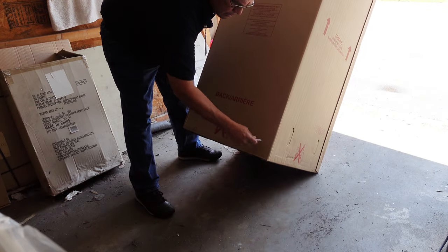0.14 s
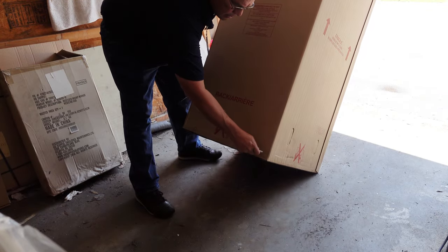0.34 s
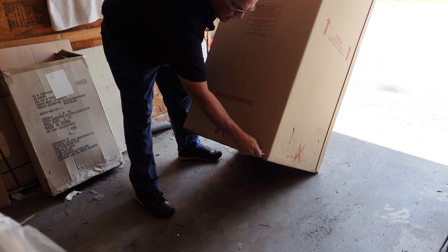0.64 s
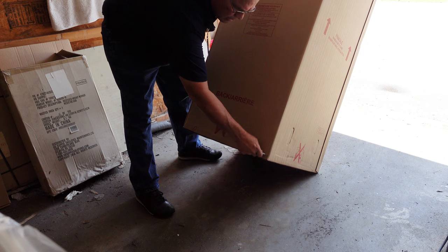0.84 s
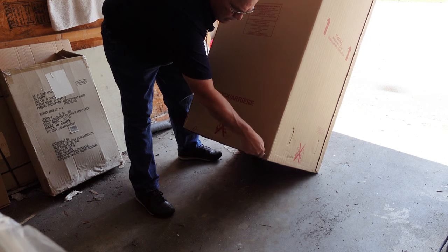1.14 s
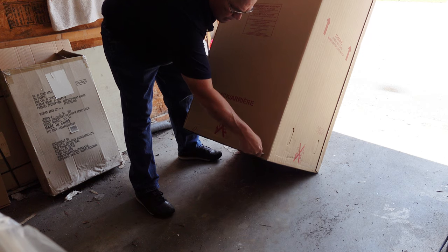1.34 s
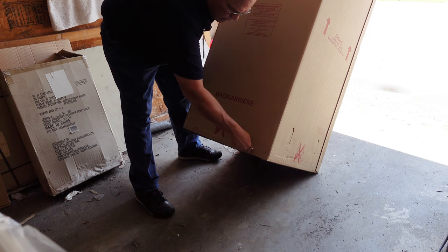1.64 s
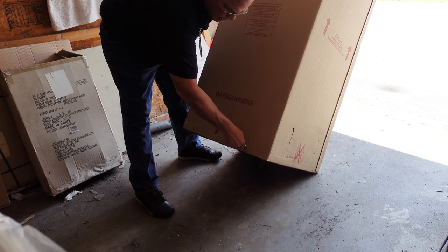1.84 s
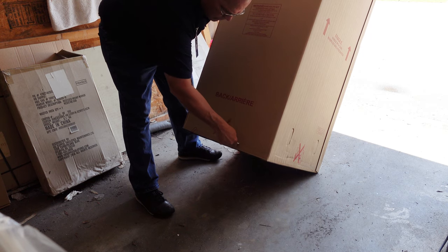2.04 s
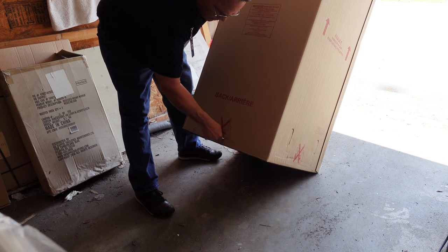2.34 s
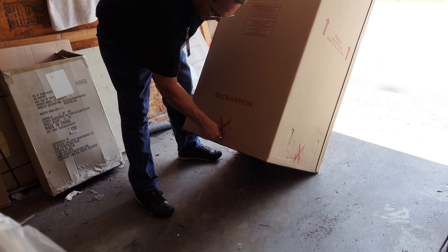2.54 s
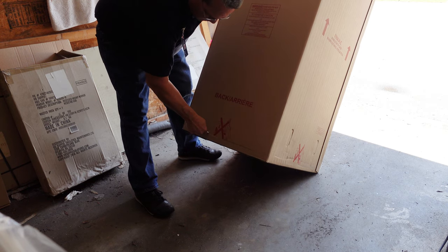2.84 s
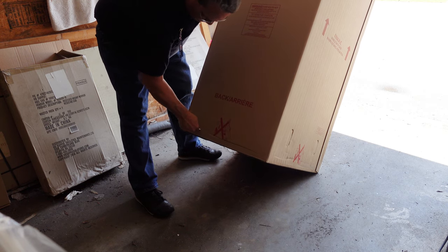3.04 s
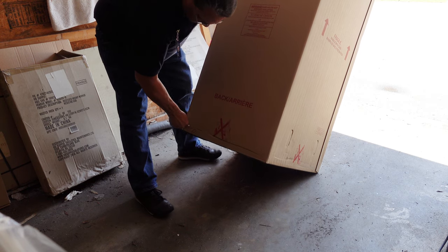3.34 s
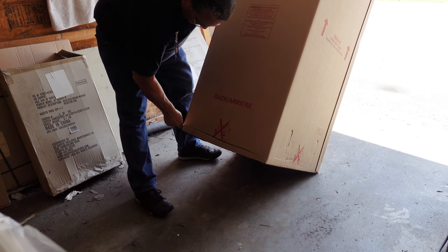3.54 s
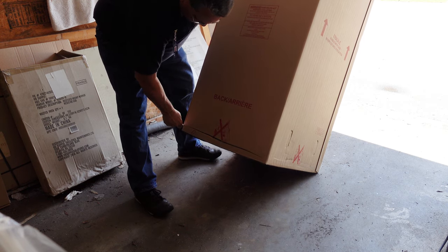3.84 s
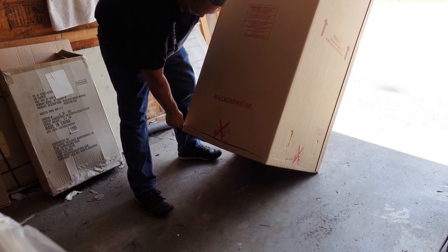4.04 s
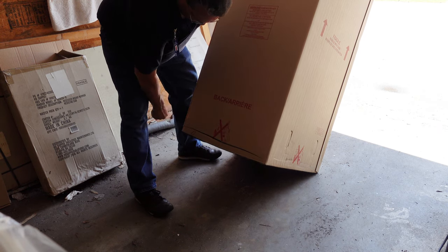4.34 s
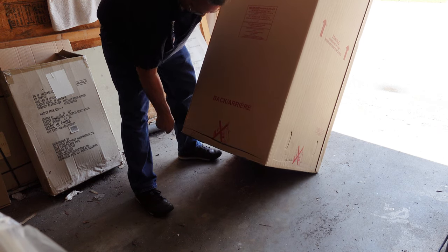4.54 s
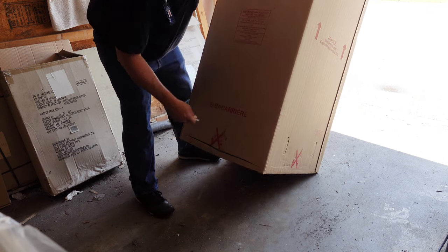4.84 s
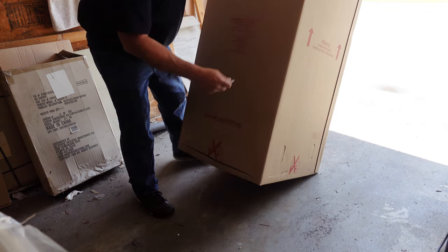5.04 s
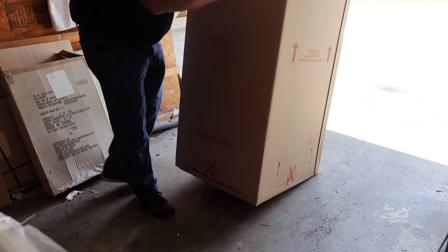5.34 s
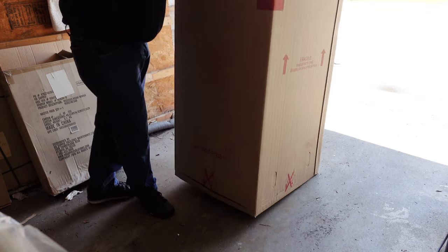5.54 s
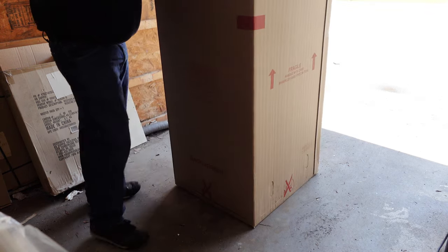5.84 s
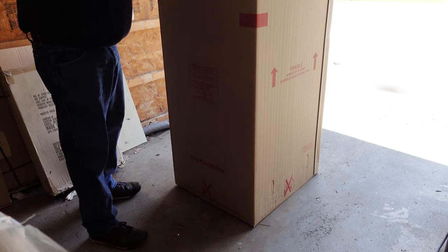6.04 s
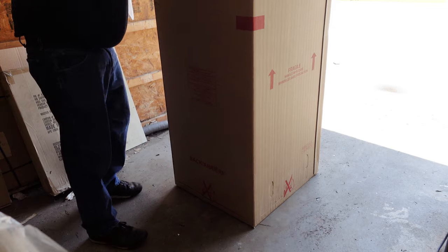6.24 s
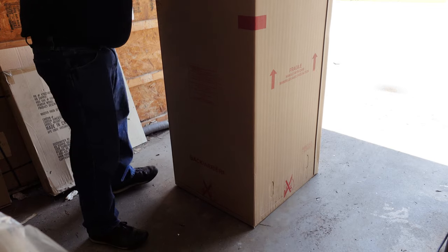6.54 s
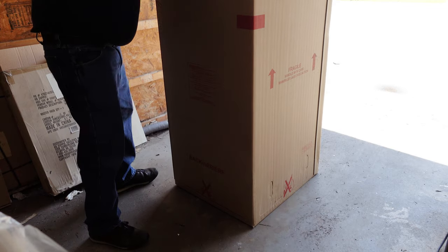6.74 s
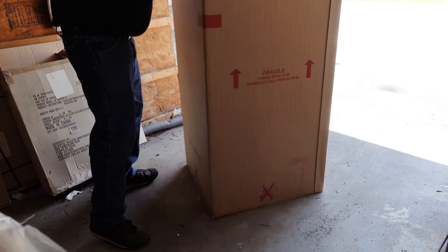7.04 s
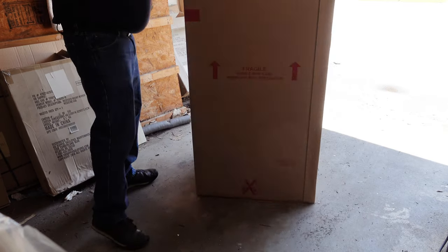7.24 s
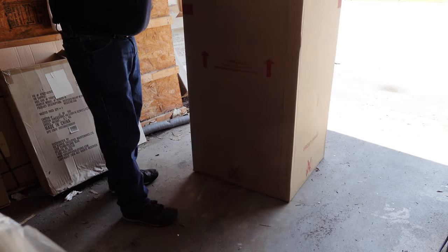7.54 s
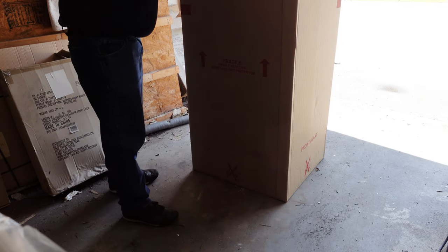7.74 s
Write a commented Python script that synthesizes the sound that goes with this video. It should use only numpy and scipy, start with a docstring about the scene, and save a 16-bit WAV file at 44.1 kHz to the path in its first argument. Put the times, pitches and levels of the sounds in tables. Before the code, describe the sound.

A blade stabs and rips along a big cardboard box in a garage, then gritty scuffs and hollow bumps before the box drags over concrete.

```python
"""A knife slits a tall cardboard box in a garage: two stabs, two long cuts, a few short rips, clicks and knocks.
Cuts are random friction grains, ridged by the corrugations, that excite box boom, wall rasp and edge hiss.
A short squeak and low falling blips, scuffs, grit and bumps follow; then the box is dragged over concrete.
A far electric motor, sines on multiples of its shaft rate over a rush of air, whines through the open door.
Steady filtered noise is the outdoor hush; random echoes place the near sounds in the garage."""
import sys
import numpy as np
from scipy import signal
from scipy.fft import rfft, irfft, next_fast_len
from scipy.io import wavfile

SR = 44100
rng = np.random.default_rng(int(sys.argv[2]) if len(sys.argv) > 2 else 0)


def dump_mix(stems):
    """Bounce the given channels to the path in sys.argv[1] as a 16-bit WAV at rate SR."""
    frames = np.atleast_2d(stems).T  # one column per channel
    limited = np.clip(frames, -1, 1)  # hard clip at full scale
    pcm = np.round(limited * 32767).astype(np.int16)
    wavfile.write(sys.argv[1], SR, pcm)


N = 348283
TIME = np.arange(N) / SR
TAPS = 4096  # filter length, samples
HZ = np.fft.rfftfreq(TAPS, 1 / SR)

# spectrum of torn board: f/Hz, density/dB per Hz
TEAR_SPECTRUM = [(40, -57), (400, -16.5), (750, -7), (1000, -7), (1400, 1), (2000, -2), (3300, 1.5),
                 (5000, 1), (7000, -1.5), (9000, -10.5), (12000, -18), (16000, -28)]
# spectrum of rubbing on the gritty floor: f/Hz, density/dB per Hz
FLOOR_SPECTRUM = [(35, -64), (60, -43), (256, -23.5), (380, -14.5), (540, -10), (822, -10.5), (1250, -2),
                  (2190, 1), (5000, 0), (7750, -4), (12400, -18.5), (16000, -27)]


def gain_of(db):
    """Decibels to amplitude."""
    return 10 ** (np.asarray(db) / 20)


def evened(x):
    """Scales to rms 1."""
    return x / np.sqrt(np.mean(x ** 2) + 1e-20)


def read(points, hz=HZ):
    """Interpolates a spectrum table on a log-frequency axis."""
    f, value = np.transpose(points)
    return np.interp(np.log(hz + 1), np.log(f + 1), value)


def tilt(db_per_octave):
    """A straight spectral slope in dB, pivoting at 3500 Hz."""
    return db_per_octave * np.log2((HZ + 1) / 3500)


def follow(rows, t):
    """The columns of a curve table at the times t."""
    s, *columns = np.transpose(rows)
    return [np.interp(t, s, c) for c in columns]


def add(mix, s, sound):
    """Mixes a sound in at time s."""
    part = mix[max(round(s * SR), 0):][:len(sound)]
    part += sound[:len(part)]


def impulse(db):
    """The minimum-phase impulse response of a dB spectrum, floored 100 dB below its peak."""
    log_gain = np.maximum(db - db.max(), -100) * np.log(10) / 20
    circle = np.concatenate([log_gain, log_gain[-2:0:-1]])
    return np.fft.ifft(np.exp(np.conj(signal.hilbert(circle)))).real


def colour(x, db):
    """Filters by a dB spectrum, keeping the power of white input."""
    h = impulse(db)
    return signal.fftconvolve(x, h / np.linalg.norm(h))[:len(x)]


def wander(size, hz):
    """Low-passed noise, rms 1 over the scene's length, cut to size."""
    f = np.fft.rfftfreq(N, 1 / SR)
    slow = irfft(rfft(rng.standard_normal(N)) / (1 + (f / hz) ** 4), N)
    return evened(slow)[:size]


def grains(size, per_s, spread_db):
    """A random train of tiny ruptures, a few much larger than the rest, rms 1."""
    height = gain_of(spread_db * np.minimum(rng.exponential(1, size), 4))
    height = height * rng.choice([-1, 1], size)
    return evened(height * (rng.random(size) < per_s / SR))


def gate(t, attack, stop, release):
    """Linear rise over the attack, hold until the stop, exponential decay; all in seconds."""
    return np.minimum(t / max(attack, 1e-4), 1) * np.exp(-np.maximum(t - stop, 0) / max(release, 1e-3))


def ports(a, b):
    """Two unrelated sounds become a diffuse field at a close pair of microphones."""
    # f/Hz, left-right likeness/0-1
    likeness = [(100, 1), (500, 0.9), (1000, 0.63), (2000, 0.54), (4000, 0.62), (8000, 0.38), (14000, 0.24)]
    same = np.clip(read(likeness, np.fft.rfftfreq(len(a), 1 / SR)), -1, 1)
    return np.array([a, irfft(same * rfft(a) + np.sqrt(1 - same ** 2) * rfft(b), len(a))])


def hush(spectrum):
    """Steady diffuse noise, each source noise coloured by the spectrum."""
    return ports(*(colour(rng.standard_normal(N), read(spectrum)) for _ in range(2)))


def motor(whine_db, rush_db, waver, fading_db):
    """A far motor: multiples of the shaft rate waver together and fade separately over its rush of air."""
    # how the motor carries: t/s, level/dB, share of the second whine colour/0-1
    carry = [(0, -24.5, 0.2), (1.2, -13, 0.1), (2.5, -4, 0.1), (3.7, -6, 0.56), (5.4, -2.5, 0.46),
             (6.2, 0.5, 0.9), (6.7, 1.5, 0.7), (7.4, 6, 1), (7.9, -17, 1)]
    # the motor's air: f/Hz, density/dB per Hz
    air_rush = [(180, -68.5), (300, -14.5), (486, -11.5), (1230, -11), (3130, -7.5), (3460, -7), (5800, -3),
                (6520, -31), (7820, -1.5), (9390, -15), (16000, -43)]
    # shaft rate before the waver: t/s, f/Hz
    shaft = [(4.0, 283.5), (5.2, 283.45), (6.3, 283.15)]
    # two whine colours, one row each; columns are successive multiples: relative level/dB
    whine_colours_db = [
        [-71.5, -91, -69.5, -82, -73, -85, -75, -88, -67.5, -88, -72, -88, -72.5, -66.5, -70, -69, -71],
        [-93, -88, -82, -86, -69, -71, -84, -82, -70, -86, -85, -74, -65, -92, -73, -74, -76],
    ]
    lowest_multiple = 12
    partner_hz, partner_db = 107, 2.5  # even multiples have a partner above, in the first colour only
    fade_step_s = 0.15

    carry_db, second = follow(carry, TIME)
    second = np.clip(second, 0, 1)
    turns = np.cumsum(follow(shaft, TIME)[0] * (1 + waver * wander(N, 8.0))) / SR
    knots = np.arange(0, N / SR + 1, fade_step_s)
    whine = np.zeros((2, N))
    for k, (first_db, second_db) in enumerate(zip(*whine_colours_db), lowest_multiple):
        partials = [(k * turns, gain_of(first_db) * (1 - second) + gain_of(second_db) * second)]
        if k % 2 == 0:
            partials.append((k * turns + partner_hz * TIME, gain_of(first_db + partner_db) * (1 - second)))
        for cycles, gain in partials:
            fading = np.interp(TIME, knots, gain_of(fading_db * rng.standard_normal(len(knots))))
            phase = 2 * np.pi * rng.random() + .5 * rng.standard_normal((2, 1))
            whine += np.sqrt(2) * gain * fading * np.sin(2 * np.pi * cycles + phase)
    return gain_of(carry_db) * (gain_of(whine_db) * whine + gain_of(rush_db) * hush(air_rush))


def snap(s, db, hz, octaves, crumble):
    """A click or knock that crumbles away: decaying noise coloured around a centre frequency."""
    t = np.arange(TAPS) / SR
    peak_db = -20 * np.log10(1 + (np.log2((HZ + 1) / hz) / octaves) ** 2)
    burst = rng.standard_normal(TAPS) * np.exp(-t / max(crumble, 1e-4))
    click = colour(burst, peak_db + read(TEAR_SPECTRUM))
    return s, gain_of(db) * click / abs(click).max()


def panels_db():
    """The spectrum that the box panels ring with: a power sum of modes."""
    # panel modes: f/Hz, half width/Hz (to -6 dB), level/dB
    modes = [(151, 59, -3), (310, 29, -0.5), (422, 23.4, 2.5), (588, 190, -0.5), (890, 190, -2.5),
             (1260, 300, -3)]
    power = sum(gain_of(db) ** 2 / (1 + ((HZ - f) / w) ** 2) ** 2 for f, w, db in modes)
    return 10 * np.log10(power + 1e-12)


def rasp(s, rise, decay, db, tilt_db, boom_db, boom_hz, spectrum=TEAR_SPECTRUM):
    """A short burst of tearing or scuffing; the place of contact picks which box panels ring under it."""
    t = np.arange(SR // 3) / SR
    stroke = gate(t, rise, rise, decay)
    tear = colour(stroke * grains(len(t), per_s=9000, spread_db=3.0), read(spectrum) + tilt(tilt_db))
    place_db = -9.5 * np.log2((HZ + 1) / boom_hz) ** 2
    # the panels take up the blow slowly: its power is smoothed over 6.6 ms
    flex = signal.lfilter([1], [1, -np.exp(-1 / (0.0066 * SR))], stroke ** 2) ** .5
    boom = colour(flex * rng.standard_normal(len(t)), panels_db() + place_db)
    boom *= np.linalg.norm(stroke) / np.linalg.norm(boom)
    return s, gain_of(db) * tear + gain_of(boom_db) * boom


def rub(drive, spectrum, wall, boom_db, hiss_db):
    """Friction grains excite the box (boom), the wall at the contact (rasp) and the sharp edge (hiss)."""
    shape_db = read(spectrum) + sum(db / (1 + (2 * (HZ - f) / w) ** 2) for f, w, db in wall)
    shape_db += 0.37 * np.clip(panels_db() + 8.5, -8, 8) * (HZ < 1000)  # panel modes show in the boom
    below = 1 / (1 + (HZ / 900) ** 8)
    above = 1 - 1 / (1 + (HZ / 5000) ** 12)
    shares = below, np.abs(1 - below - above), above
    size = next_fast_len(len(drive) + TAPS)
    hz = np.fft.rfftfreq(size, 1 / SR)
    sound = rfft(colour(drive, shape_db), size)
    boom, middle, hiss = (evened(irfft(sound * np.interp(hz, HZ, share), size)[:len(drive)])
                          for share in shares)
    return middle + gain_of(boom_db) * boom + gain_of(hiss_db) * hiss


def cut(start, end, db, swell_db, boom_db, hiss_db, flute_hz, spectrum, wall):
    """The blade is drawn along the box ever faster, catching on each corrugation in turn."""
    # the blade sticks for a moment: t/s, half length/s (to 1/e of the dip), dip/dB
    stalls = [(2.855, 0.034, -6.5), (3.136, .01, -9), (3.173, 0.013, -5)]
    attack_s, release_s = 0.015, 0.012
    easiest, bite_db = 0.4, 0.5  # bites in, runs most easily at this share of the cut, then is pulled harder
    ease_from, ease_db = 0.89, -3.5  # the pull slackens just before the corner
    judder_db, judder_hz = 0.65, 25  # the board resists unevenly
    speed_up, flute_depth, flute_jitter, jitter_hz = 2.1, 0.24, 0.249, 9.2
    mid_panel_db, hiss_per_db = 1.5, -0.02  # booms most in mid-panel; hiss share falls slightly with force
    ring_at_start, ring_at_end = 1.88, 0.8  # scale of wall lifts: clear at first, damped as the blade digs in

    t = np.arange(0, end - start + 6 * release_s, 1 / SR)
    along = np.minimum(t / (end - start), 1)
    bite = bite_db * (1 - along / easiest) ** 2
    pull = swell_db * ((along - easiest) / (1 - easiest)) ** 2
    force_db = np.where(along < easiest, bite, pull)
    force_db = force_db + sum(dip * np.exp(-((start + t - s) / half) ** 2) for s, half, dip in stalls)
    force_db = force_db + np.interp(along, [ease_from, 1], [0, ease_db])
    force_db = force_db + judder_db * wander(len(t), judder_hz)

    flute_rate = flute_hz * speed_up ** (along ** 2) * (1 + flute_jitter * wander(len(t), jitter_hz))
    turns = np.cumsum(flute_rate) / SR
    drive = grains(len(t), per_s=4000, spread_db=2.0) * (1 + flute_depth * np.cos(2 * np.pi * turns))
    booms_db = boom_db - mid_panel_db * (2 * along - 1) ** 2
    hisses_db = hiss_db + hiss_per_db * force_db
    ringing, damped = (rub(drive, spectrum, [(hz, width, ring * lift) for hz, width, lift in wall],
                           booms_db, hisses_db) for ring in (ring_at_start, ring_at_end))
    sound = ringing + along * (damped - ringing)
    return start, gain_of(db + force_db) * gate(t, attack_s, end - start, release_s) * sound


def falling_blip(s, length, start_hz, end_hz, db, fall_db):
    """A short falling tone of three harmonics: a squeak if strong in overtones, else a low, nearly pure blip."""
    t = np.arange(0, length, 1 / SR)
    turns = np.cumsum(np.interp(t, [0, length], [start_hz, end_hz])) / SR
    tone = sum(gain_of(-fall_db * k) * np.sin(2 * np.pi * (k + 1) * turns) for k in range(3))
    return s, gain_of(db) * evened(tone * np.sin(np.pi * t / length) ** 2)


def scuff(s, rise, decay, db, tilt_db):
    """A sole or the box edge rubs briefly on the gritty floor; the box rings faintly."""
    return rasp(s, rise, decay, db, tilt_db, boom_db=db - 24.5, boom_hz=550, spectrum=FLOOR_SPECTRUM)


def grit(s, db, hz):
    """A grain of grit is crushed: a very short click."""
    return snap(s, db, hz, octaves=1.3, crumble=0.0004)


def crackle():
    """Fine grit breaks at random under the shifting soles."""
    start_s, end_s, level_db, per_s = 5.45, 6.9, -58.5, 460
    size = round((end_s - start_s) * SR)
    ticks = colour(grains(size, per_s, spread_db=4.0), read(FLOOR_SPECTRUM) + tilt(3.5))
    return start_s, gain_of(level_db) * signal.windows.tukey(size, .5) * ticks


def bump(s, db, boom_hz):
    """An edge of the box meets the floor: a hollow boom with a dull gritty burst."""
    grit_db = db + 3
    return rasp(s, 0.0033, 0.012, grit_db, -4.5, db, boom_hz, FLOOR_SPECTRUM)


def drag():
    """The base of the box grinds over the concrete: dense grains, a quick start and a quick stop."""
    # rubbing base: f/Hz, density/dB per Hz
    base_spectrum = [(35, -67), (60, -44), (222, -22.5), (323, -8), (469, -9), (621, -3.5), (715, -7.5),
                     (1040, -2.5), (1410, -2.5), (1860, 1), (2470, 3.5), (5460, 1.5), (7750, -2.5),
                     (13900, -17), (16000, -27)]
    # wall resonances: f/Hz, width/Hz, lift/dB
    base_wall = [(310, 49, -3), (730, 110, 2.5), (980, 110, -2.5), (1420, 390, 6.5), (2500, 610, -0.5)]
    start_s, stop_s, attack_s, release_s = 6.77, 7.7, 0.086, 0.033
    level_db, sag_db_per_s = -36.6, -0.8
    steady_hiss_db, stop_dull_db_per_s = -2.5, -68  # the hiss goes first as the box stops
    light_boom_db, settled_boom_db, settle_s = -22.5, -10.5, 0.31  # boom grows as the weight settles

    length = stop_s - start_s
    t = np.arange(0, length + 6 * release_s, 1 / SR)
    hiss_db = steady_hiss_db + stop_dull_db_per_s * np.maximum(t - length, 0)
    boom_db = np.interp(t, [0, settle_s], [light_boom_db, settled_boom_db])
    drive = grains(len(t), per_s=16000, spread_db=3.0)
    sound = rub(drive, base_spectrum, base_wall, boom_db, hiss_db)
    return start_s, gain_of(level_db + sag_db_per_s * t) * gate(t, attack_s, length, release_s) * sound


def echoes(wet_db, early_db):
    """Direct sound, a scatter of echoes from floor and box, and a short tail that dies by band."""
    # f/Hz, t60/s
    decay_times = [(150, 0.44), (400, 0.25), (1000, 0.27), (3000, 0.33), (7000, 0.25), (14000, 0.37)]
    size = SR // 2
    slots = np.arange(60, size - 12, 12)  # one random tap in each 12 samples
    at = slots + rng.integers(0, 12, (2, len(slots)))
    taps = np.zeros((2, size))
    np.put_along_axis(taps, at, rng.choice([-1., 1.], (2, len(slots))), 1)
    hz, t, z = signal.stft(taps, SR, nperseg=256)
    tail = signal.istft(z * gain_of(-60 * t / read(decay_times, hz)[:, None]), SR, nperseg=256)[1]
    early = np.zeros_like(tail)
    signs = rng.choice([-1., 1.], (2, 12)) / np.sqrt(12)
    np.put_along_axis(early, rng.integers(8, 300, (2, 12)), signs, 1)
    response = ports(*(gain_of(wet_db) * tail / np.linalg.norm(tail[0]) + gain_of(early_db) * early))
    response[:, 0] += 1
    return response / np.linalg.norm(response[0])


def garage(x, wet_db, early_db, count):
    """The point of contact keeps moving, so the sound passes from one pattern of echoes to the next."""
    place = TIME * 11  # patterns per second
    out = np.zeros((2, N))
    for k in range(count):
        away = np.abs((place - k + count / 2) % count - count / 2)
        share = np.cos(np.pi / 2 * np.minimum(away, 1))
        response = echoes(wet_db, early_db)
        direct = response[:, :1].copy()
        response[:, 0] = 0
        out += direct * x * share ** 2  # squared shares sum to 1
        out += signal.fftconvolve((x * share)[None], response, axes=1)[:, :N]
    return out


def scene():
    """Knife, box and feet in the garage, over the sounds from outside."""
    # outdoor hush: f/Hz, density/dB per Hz
    outdoor_spectrum = [(15, -58), (25, -31), (58, -14), (87, -17.5), (120, -11), (270, -19.5), (575, -4),
                        (1040, -7), (1160, -3.5), (1890, -4.5), (2910, -2), (3720, -3), (6920, -4),
                        (9840, -17.5), (16000, -26)]
    # knife stabs, short rips: t/s, rise/s, decay/s, level/dB, tilt/dB per octave, boom/dB, boom centre f/Hz
    rips = [(0.9259, 0.00084, 0.019, -38.5, 0.5, -47.5, 413), (1.01, 0.017, 0.029, -53, -2, -63, 450),
            (1.183, 0.0055, .027, -36, 1.5, -46.5, 410), (1.3, 0.056, .03, -43.5, 0, -58.5, 497),
            (1.424, 0.0051, 0.022, -46.5, -2, -58.5, 452), (1.454, 0.0054, 0.11, -40.5, -0.5, -53.5, 423),
            (1.574, 0.0039, 0.012, -37.5, -2, -40.5, 425), (1.63, 0.0085, 0.015, -34.5, -2, -44, 504),
            (2.37, 0.026, 0.071, -46, -1, -45.5, 1080), (2.6615, 0.00094, 0.022, -34.5, -3, -41.5, 800),
            (2.67, 0.01, 0.037, -32, -3, -37, 890), (2.718, 0.013, 0.037, -38.5, 6, -48, 383),
            (3.49, 0.0073, 0.017, -36, 1.5, -41, 346), (3.897, 0.019, 0.035, -42.5, 1, -59.5, 550),
            (4.166, .009, 0.13, -58, 0, -91, 398), (4.28, 0.016, 0.041, -48.5, -3.5, -75, 1190),
            (4.351, 0.0085, 0.011, -38, -2, -62, 595), (4.368, 0.0057, .007, -30, -1, -40, 477),
            (4.383, 0.012, 0.029, -34.5, -0.5, -47.5, 274), (4.705, 0.0046, 0.036, -43.5, -0.5, -54.5, 440)]
    # blade clicks, board snaps and, in the last two rows, woody board knocks:
    # t/s, peak before echoes/dB, centre f/Hz, width/octaves, crumbling time/s
    clicks_and_knocks = [(0.892, -36.5, 5500, 12, 0.0039), (0.927, -28.5, 5000, 0.22, .002),
                         (1.043, -39, 4500, 1.6, 0.0016), (1.1478, -42, 6000, 1.6, .002),
                         (2.48, -37, 6500, 2, 0.0026), (3.8828, -28, 5340, 0.63, 0.0013),
                         (3.889, -27, 5200, 0.34, .0017), (4.233, -40, 8500, 0.2, .0055),
                         (4.798, -34, 3400, 1, .0006), (4.958, -35, 2540, 0.28, 0.0015),
                         (5.932, -29, 1490, 0.41, .0027), (6.421, -30.5, 1480, 0.58, 0.0021)]
    # long cuts: start t/s, end t/s, level before force and trim/dB, swell toward the end/dB,
    # boom in mid-panel/dB, edge hiss at zero force/dB, starting flute rate before jitter/Hz
    cuts = [(1.55, 2.493, -46, 8, -6, -1.5, 26), (2.739, 3.538, -43, 4, -8, -0.5, 25)]
    # one spectrum a cut: f/Hz, density/dB per Hz
    cut_spectra = [
        [(35, -77), (60, -36), (156, -15.5), (346, -10.5), (417, 0), (469, -8.5), (566, -5.5), (1060, -4),
         (1410, -2), (2090, -4.5), (2300, -9), (2650, -6), (6280, -9), (11500, -21), (16000, -31)],
        [(35, -70), (60, -30), (142, -13), (193, -15.5), (294, -6.5), (338, -10.5), (408, 1), (458, -1),
         (593, -1), (749, -6.5), (1700, -7), (3580, -5), (6140, 1), (11800, -14.5), (16000, -25)],
    ]
    # wall resonances beside the blade, one table a cut: f/Hz, width/Hz, lift before ring scaling/dB
    cut_walls = [
        [(556, 110, 6.5), (1000, 160, -2), (1390, 190, 2.5), (2340, 130, 7.5), (3680, 740, 1.5),
         (5040, 770, -0.5), (6600, 2400, 3)],
        [(606, 93, 2), (1184, 63, 6.5), (1725, 600, 7.5), (2490, 340, 4), (3300, 410, 0.5), (5000, 700, -1.5),
         (6900, 2600, 3)],
    ]
    # one short squeak, then low, nearly pure falling blips, like grunts or hollow box knocks:
    # t/s, length/s, start f/Hz, end f/Hz, level/dB, fall per overtone/dB
    blips = [(3.975, 0.014, 1770, 1580, -45.5, 2), (4.473, 0.013, 800, 725, -55, 20),
             (4.996, 0.012, 606, 556, -56.5, 24), (5.528, 0.015, 690, 543, -57, 23),
             (6.004, 0.043, 600, 503, -58.5, 24), (6.426, 0.024, 577, 524, -54.5, 24)]
    # soles and box edge on grit: t/s, rise/s, decay/s, level/dB, tilt/dB per octave
    scuffs = [(5.045, 0.029, .029, -43, -0.5), (5.109, 0.024, 0.031, -40.5, 2),
              (5.2, 0.017, 0.093, -51.5, 4.5), (5.325, .006, 0.027, -49, 3.5), (5.505, 0.009, 0.12, -50, 1),
              (5.59, 0.066, .03, -42, -1), (5.695, 0.012, 0.042, -39.5, -1), (5.77, 0.032, 0.054, -45, -2),
              (5.838, 0.037, 0.041, -34.5, 0), (5.929, 0.0043, 0.032, -37.5, -0.5),
              (5.99, 0.011, 0.085, -46.5, -0.5), (6.207, 0.0044, 0.042, -41, -1),
              (6.375, .045, 0.02, -47.5, -0.5), (6.54, 0.025, 0.037, -46, 3.5),
              (6.695, 0.0048, 0.058, -48.5, -0.5)]
    # grit cracks underfoot: t/s, peak before echoes/dB, centre f/Hz
    cracks = [(5.11, -18.5, 3970), (5.232, -31, 3500), (5.5876, -28.5, 4200), (5.8, -25.5, 3380),
              (5.855, -23.5, 4000), (5.88, -33, 4000), (5.909, -40, 4000), (5.953, -26, 3220),
              (6.015, -32, 3500), (6.2103, -21, 3880), (6.229, -34, 3000)]
    # box bumps as it settles: t/s, boom level/dB, boom centre f/Hz
    bumps = [(5.535, -54.5, 600), (5.64, -50, 414), (5.71, -54, 420), (5.84, -49, 485), (5.93, -45.5, 480),
             (6.018, -48, 450), (6.425, -58.5, 346), (7.812, -60, 1310)]
    outdoor_db, knife_trim_db = -64.5, -1.14

    knife, sliding, hits = np.zeros((3, N))
    for row, spectrum, wall in zip(cuts, cut_spectra, cut_walls):
        add(knife, *cut(*row, spectrum, wall))
    add(sliding, *drag())
    add(hits, *crackle())
    events = ((rasp, rips), (scuff, scuffs), (bump, bumps), (snap, clicks_and_knocks),
              (grit, cracks), (falling_blip, blips))
    for source, table in events:
        for row in table:
            add(hits, *source(*row))
    points = garage(gain_of(knife_trim_db) * knife + hits, wet_db=-3.0, early_db=-9.5, count=7)
    base = garage(sliding, wet_db=-4.5, early_db=-11, count=11)  # the whole base rubs at once
    far_motor = motor(whine_db=2.5, rush_db=-57.5, waver=0.00119, fading_db=3.0)
    return points + base + gain_of(outdoor_db) * hush(outdoor_spectrum) + far_motor


def record(dry):
    """Tilts the left-right balance by band, then limits the band with a linear-phase low-pass."""
    # f/Hz, left minus right/dB
    balance = [(60, 0.5), (110, -0.5), (200, 0.0), (380, -0.5), (700, -1.0), (1290, -1), (2380, -1.5),
               (4400, -2.0), (8120, -2.5), (15000, 0.5)]
    edge_hz = 15900
    lean_db = read(balance, np.fft.rfftfreq(N, 1 / SR))
    leaned = irfft(rfft(dry) * gain_of(np.array([lean_db, -lean_db]) / 2), N)
    low_pass = signal.firwin(511, edge_hz, window=("kaiser", 9), fs=SR)
    return signal.oaconvolve(leaned, low_pass[None], "same")


dry = scene()
out = record(dry)
dump_mix(out)
```